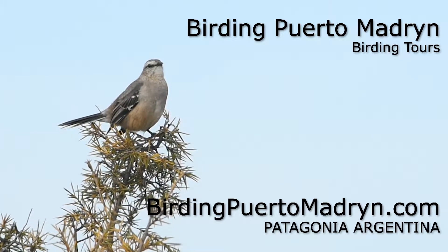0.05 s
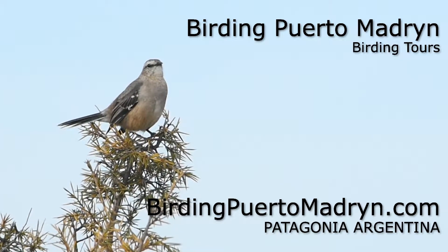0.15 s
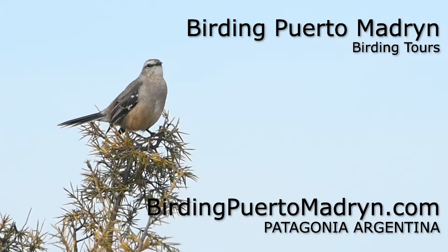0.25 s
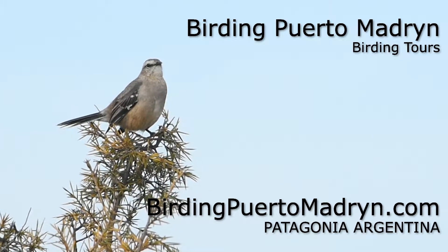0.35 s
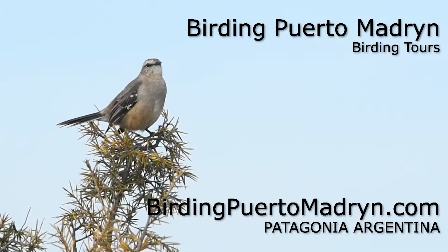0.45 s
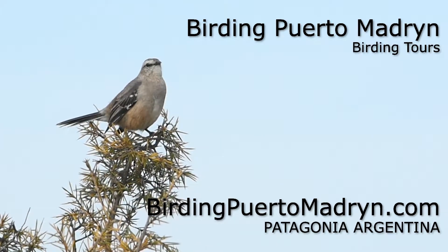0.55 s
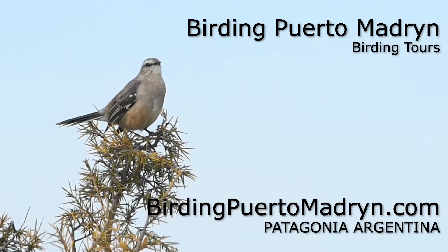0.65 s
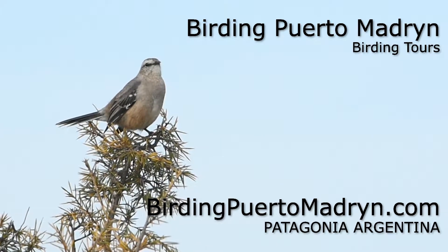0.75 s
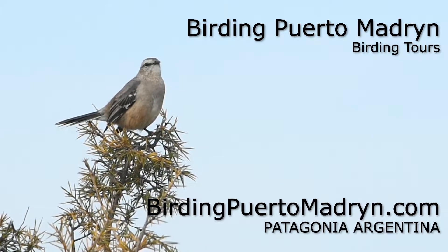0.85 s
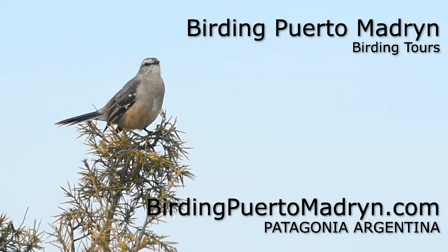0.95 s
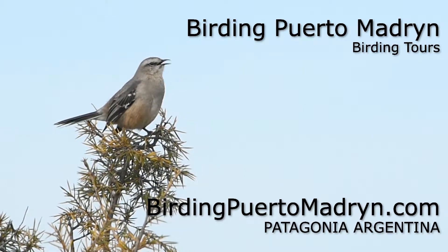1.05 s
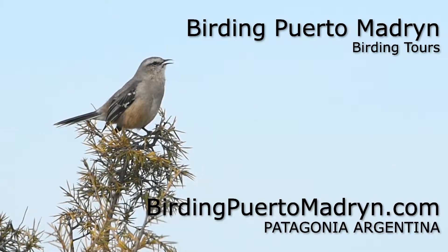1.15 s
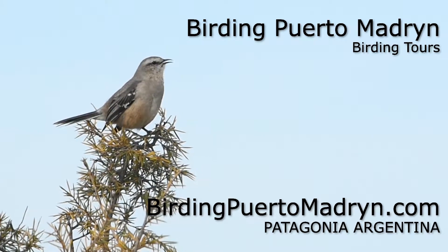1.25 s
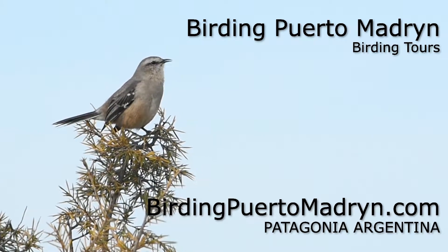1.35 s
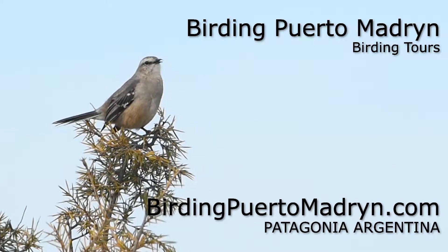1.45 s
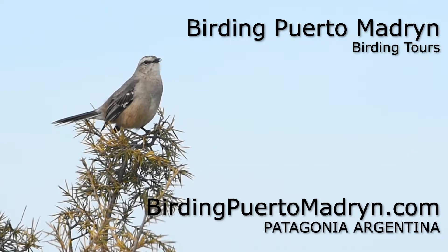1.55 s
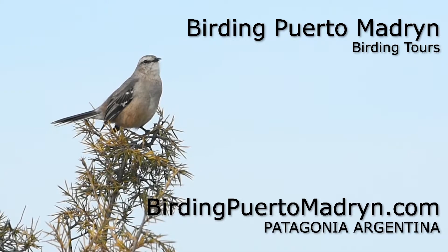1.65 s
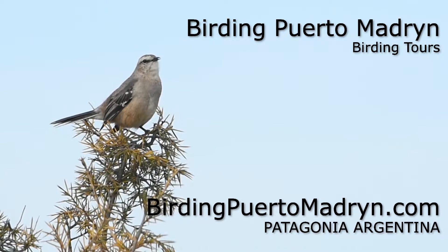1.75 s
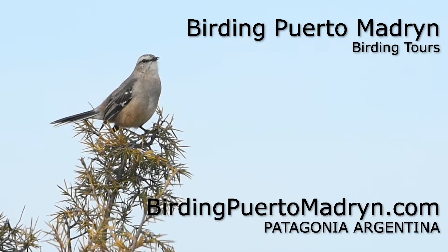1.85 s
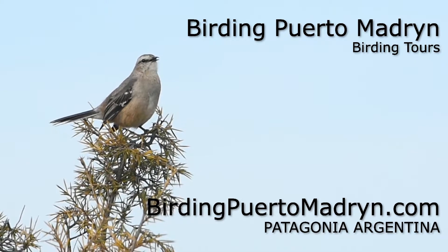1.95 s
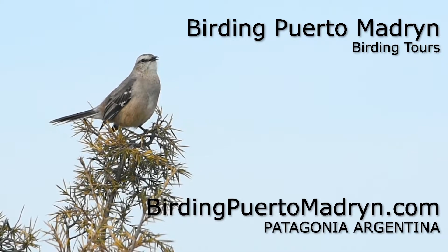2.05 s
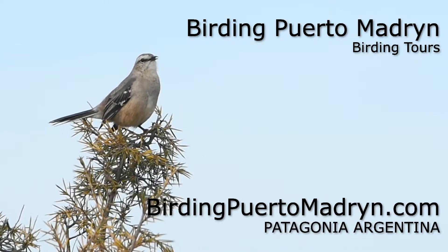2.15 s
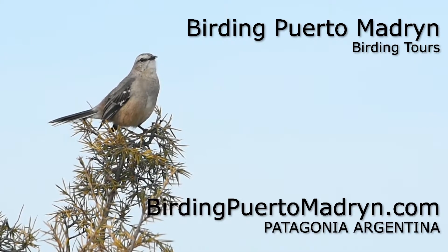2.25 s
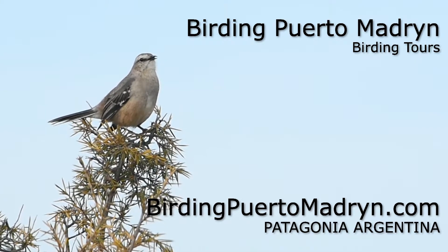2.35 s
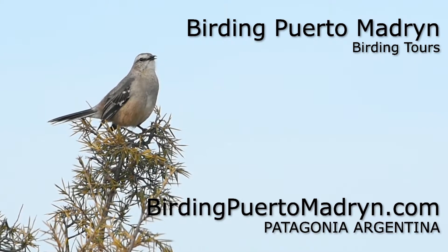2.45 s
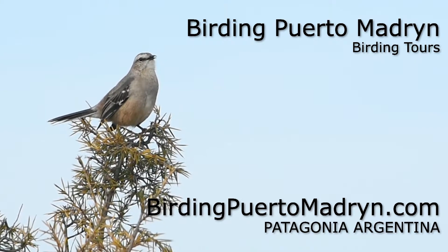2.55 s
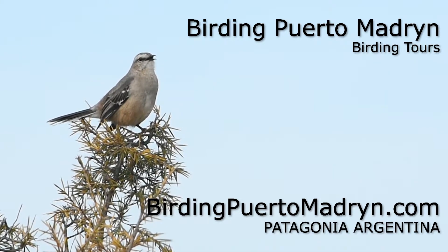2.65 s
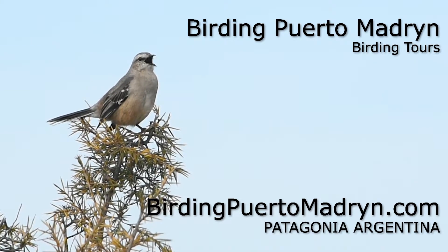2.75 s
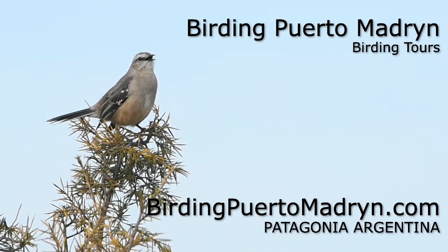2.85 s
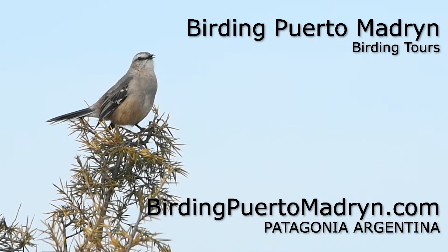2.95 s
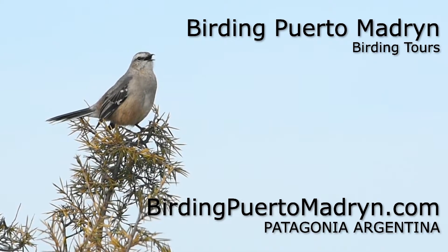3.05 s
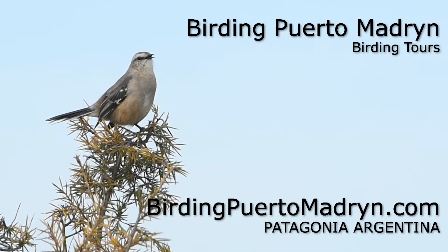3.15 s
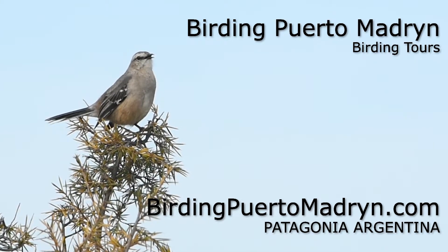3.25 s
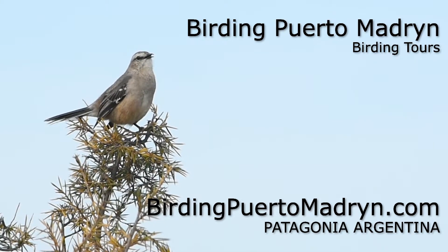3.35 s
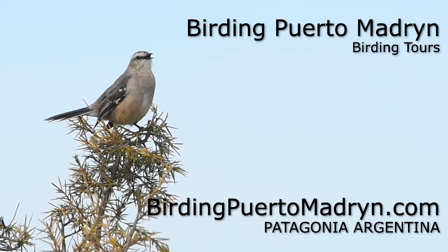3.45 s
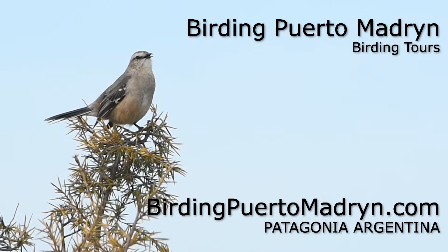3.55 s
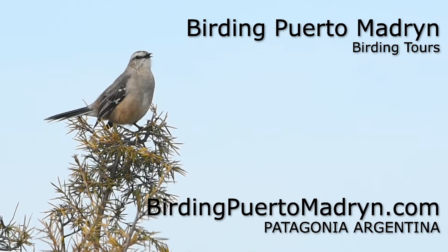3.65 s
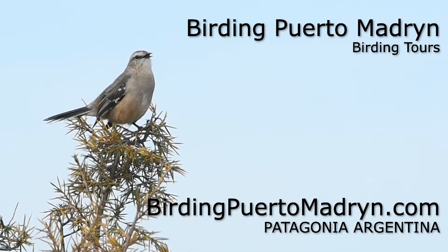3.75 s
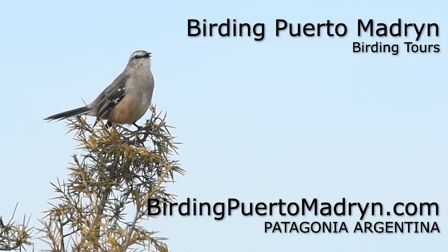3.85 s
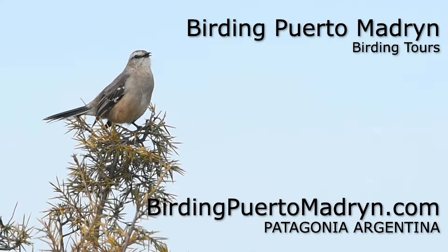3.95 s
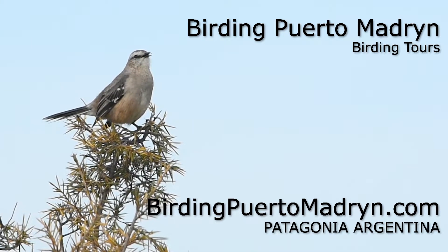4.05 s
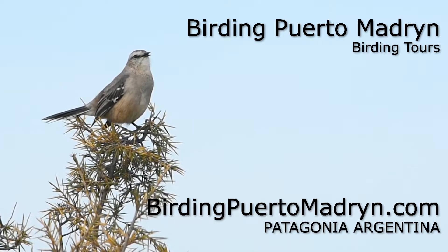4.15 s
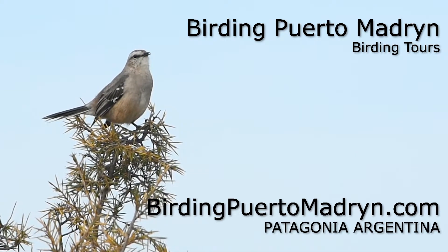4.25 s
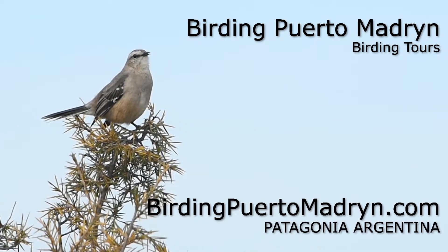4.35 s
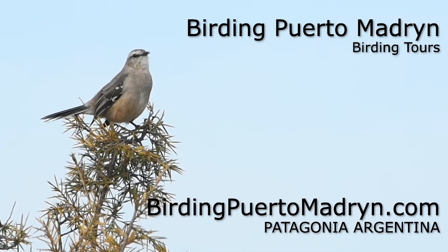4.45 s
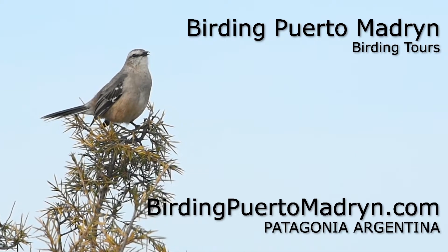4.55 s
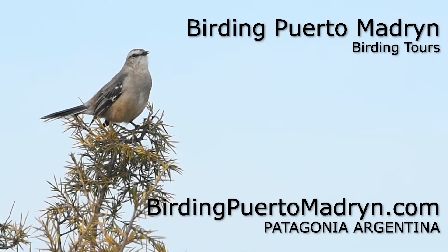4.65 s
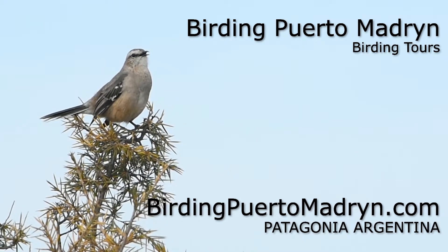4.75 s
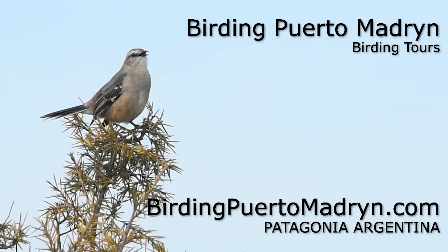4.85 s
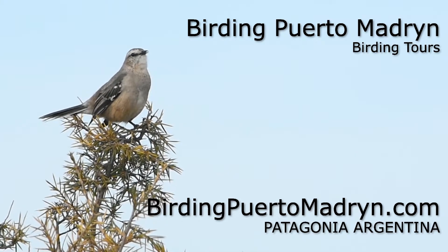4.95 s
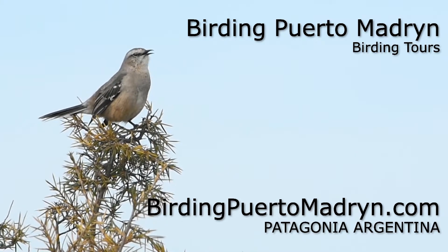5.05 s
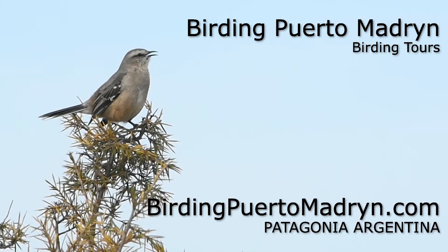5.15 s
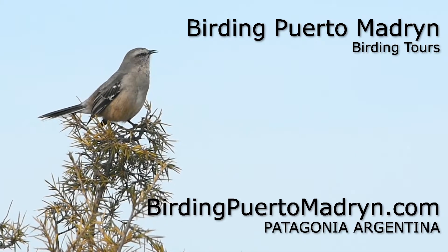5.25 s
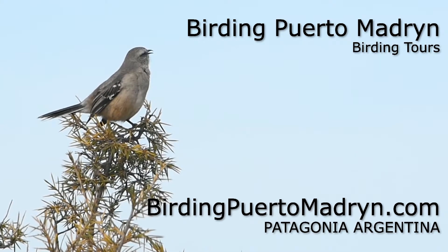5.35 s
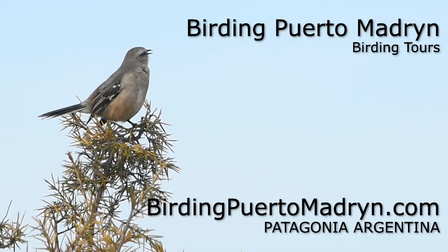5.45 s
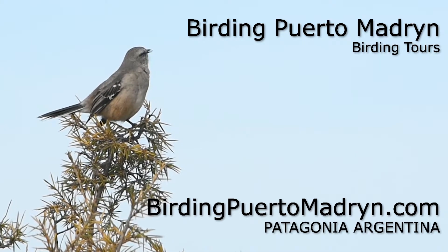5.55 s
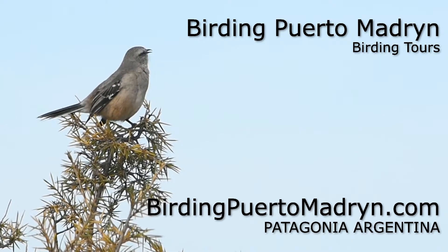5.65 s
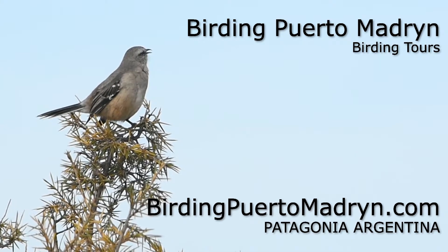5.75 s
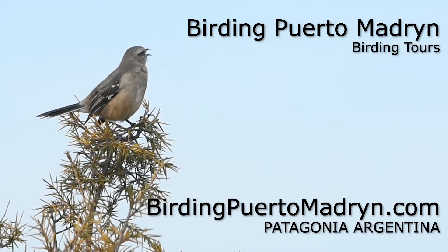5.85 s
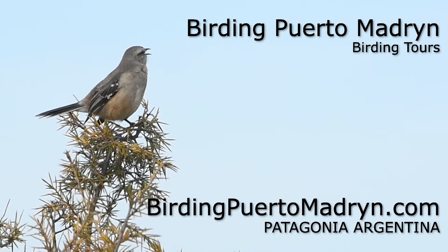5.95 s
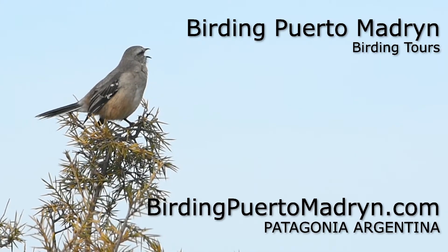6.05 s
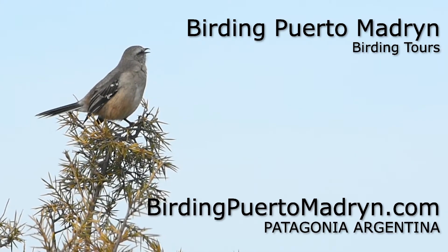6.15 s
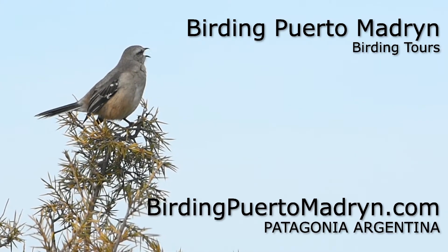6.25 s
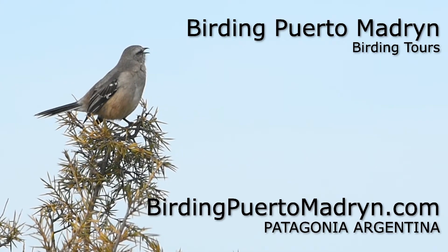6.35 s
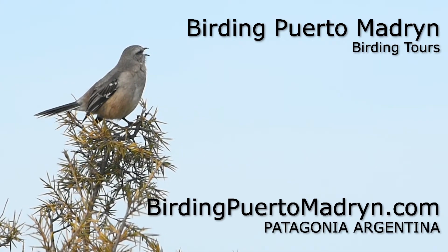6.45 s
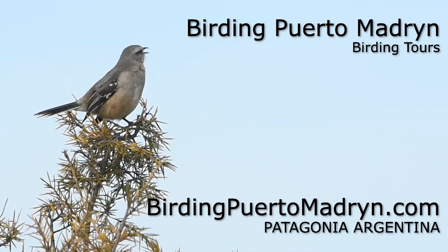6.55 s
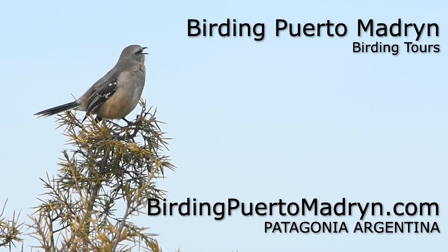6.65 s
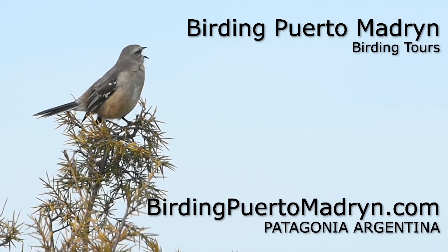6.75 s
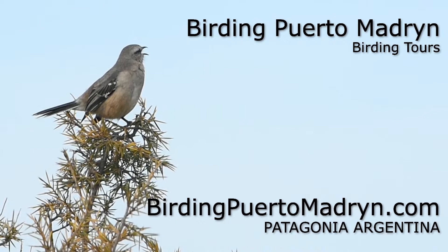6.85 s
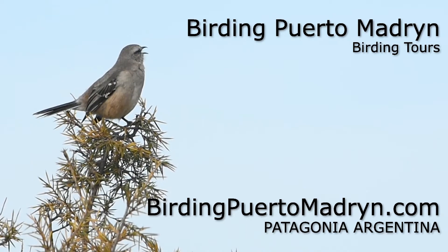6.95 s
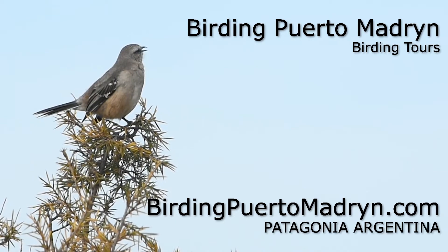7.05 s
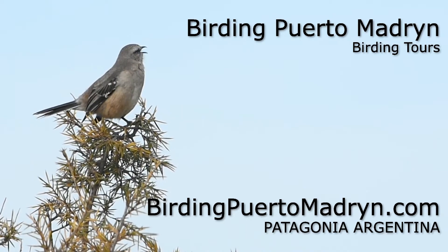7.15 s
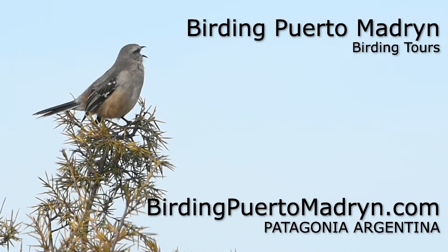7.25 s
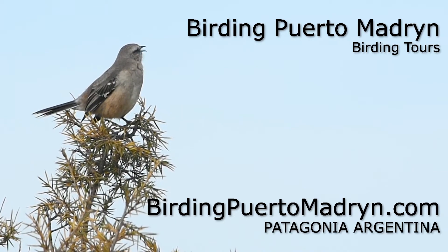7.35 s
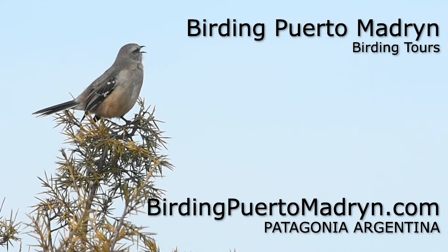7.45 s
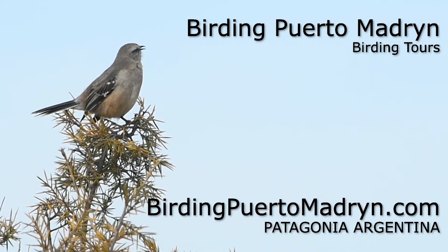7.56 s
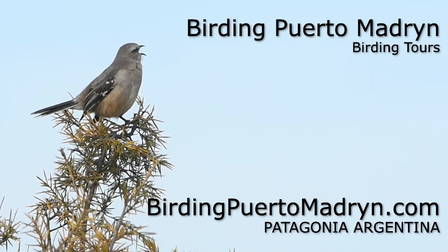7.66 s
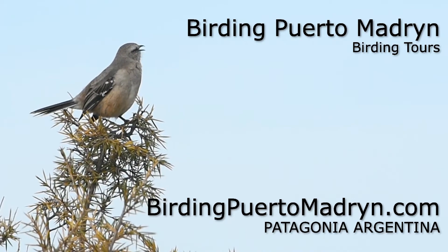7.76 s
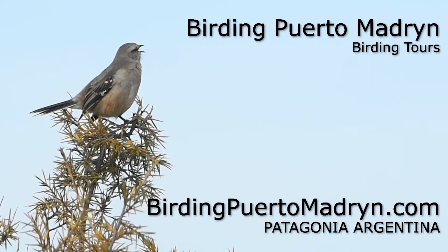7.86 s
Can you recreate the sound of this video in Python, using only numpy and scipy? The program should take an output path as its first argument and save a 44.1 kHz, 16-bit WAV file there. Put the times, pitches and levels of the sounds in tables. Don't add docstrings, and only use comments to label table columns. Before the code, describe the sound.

A mockingbird sings whistles, quick chips, warbling chups, raspy trills and deep swoops outdoors while low wind thumps and overloads the microphone.

```python
import sys
import numpy as np
from scipy import signal
from scipy.fft import rfft, irfft
from scipy.io import wavfile
from scipy.ndimage import uniform_filter1d

SR = 44100
rng = np.random.default_rng(int(sys.argv[2]) if len(sys.argv) > 2 else 0)


def file_out(sig):
    cols = np.atleast_2d(sig).T
    lim = np.clip(cols, -1, 1)
    pcm = np.round(lim * 32767).astype(np.int16)
    wavfile.write(sys.argv[1], SR, pcm)


def volts(x):
    e = np.asarray(x, float) / 20
    return 10 ** e


N = 348390

# start_s, peak_db, pitch_factor, second_voice_db, second_voice_pitch_factor
CHIPS = [(1.520, -27, 0.93, 0, 0.99), (1.645, -26.5, 0.91, 1, 1), (1.77, -27, 0.97, 5.5, 0.96),
         (1.9, -27, 0.95, 4.5, 0.98), (2.013, -25, 0.98, 1, 1.06), (2.15, -24, 0.94, -4, .96),
         (2.279, -24, 1.005, 4, .99), (2.41, -23.5, 0.93, -2, 1), (2.54, -25.5, 0.94, 5, 0.97),
         (2.661, -25.5, 0.93, 3, 1.06)]


def rms_one(x):
    return x / np.sqrt(np.mean(x ** 2, axis=-1, keepdims=True) + 1e-20)


def band(x, low_hz, high_hz, order=2):
    return signal.sosfilt(signal.butter(order, [low_hz, high_hz], "band", fs=SR, output="sos"), x)


def add(song, s, sound):
    at = int(round(s * SR))
    song[at:at + len(sound)] += sound[:N - at]


def wobble(count, hz):
    knots = rng.standard_normal(600)
    return np.interp(np.arange(count) * hz / SR, np.arange(600), knots)


def gusts():
    # full_strength_s, held_s, rumble_db, left_minus_right_db
    gust_rows = [(.1, 0.065, -28.5, 11.5), (.21, 0.013, -19.5, 9), (.46, 0.11, -29, 8.5),
                 (.62, 0.011, -17, 3.5), (.76, 0.0053, -26.5, -3), (.88, 0.021, -50, 7),
                 (1.049, 0.046, -28.5, 4.5), (1.5, 0.13, -35, 6), (1.94, 0.016, -52, 7),
                 (2.57, 0.009, -30.5, -2), (3.04, 0.086, -29.5, 5), (3.26, 0.095, -43, -2),
                 (3.57, 0.01, -32, -4.5), (3.679, 0.092, -40.5, -4), (4.0, 0.11, -36.5, -4.5),
                 (4.622, 0.17, -15.5, 0), (4.97, 0.13, -22.5, 0), (5.12, 0.07, -27.5, -6),
                 (5.48, 0.078, -20.5, 5.5), (5.582, 0.036, -10, -7.5), (5.83, 0.014, -28, -4),
                 (5.929, 0.005, -23.5, -11), (6.25, 0.16, -14.5, 8), (6.48, 0.17, -11.5, 4.5),
                 (6.85, 0.023, -20.5, -17), (7.19, 0.052, -34, -27), (7.406, 0.064, -15.5, -4.5),
                 (7.55, 0.084, -20.5, -0.5), (7.72, 0.017, -29.5, -6)]
    # time_s, rumble_db, left_minus_right_db
    breeze_rows = [(0, -36, 10), (1.0, -39, 3), (1.17, -64, 7), (1.7, -54, 4), (2.26, -65, 3),
                   (2.6, -45, 4.5), (3.099, -43.5, -3), (4.05, -46, -10), (4.4, -58, 6), (4.901, -25.5, 9),
                   (5.35, -34.5, 6), (5.75, -42, -7), (6.1, -25.5, -6), (6.75, -25.5, -7), (7.05, -40, -9),
                   (7.4, -25, 2), (7.9, -39.5, -5)]
    rise_db_per_s, fall_db_per_s = 308, 253
    veer_db, veer_per_s = 2.5, 15

    t = np.arange(0, N + 100, 100) / SR
    s, breeze_db, breeze_pan_db = np.transpose(breeze_rows)
    at, held, peak_db, pan_db = np.transpose(gust_rows)[:, :, None]
    before, after = np.maximum(at - t, 0), np.maximum(t - at - held, 0)
    power = volts(peak_db - rise_db_per_s * before - fall_db_per_s * after) ** 2
    breeze = volts(np.interp(t, s, breeze_db)) ** 2
    total = breeze + power.sum(axis=0)
    side_db = (breeze * np.interp(t, s, breeze_pan_db) + (power * pan_db).sum(axis=0)) / total

    every = np.arange(N) / SR
    rumble_db = np.interp(every, t, 10 * np.log10(total))
    side_db = np.interp(every, t, side_db)
    return rumble_db, side_db + veer_db * wobble(N, veer_per_s)


def eddies(low_hz, high_hz, even_s, alike):
    white = rng.standard_normal((2, N + SR))
    white[1] += alike * white[0]
    noise = band(white, low_hz, high_hz)[:, SR:]
    return rms_one(noise / np.sqrt(uniform_filter1d(noise ** 2, int(even_s * SR), axis=1) + 1e-9))


def buffets():
    # middle_s, peak_db, width_s, port (0 left, 1 right)
    bursts = [(0.217, -5.5, 0.012, 0), (4.619, 5.5, 0.015, 1), (4.698, 4, 0.011, 1), (4.718, 3.5, 0.012, 0),
              (4.727, -0.5, 0.0061, 1), (4.754, 2, 0.015, 0), (4.772, 3.5, 0.017, 1), (4.976, -4, 0.034, 1),
              (5.501, -6.5, 0.01, 0), (5.635, -2.5, 0.011, 0), (5.592, -2.5, 0.0038, 1),
              (5.619, 9, 0.0054, 1), (6.235, 1, 0.0027, 1), (6.264, 0, 0.02, 1), (6.267, 0.5, 0.027, 0),
              (6.324, -3.5, 0.0073, 0), (6.354, 3.5, 0.0074, 1), (6.368, -2, 0.021, 0),
              (6.385, -4.5, 0.025, 1), (6.415, 1.5, 0.0095, 0), (6.484, 8, 0.019, 0),
              (6.519, 2.5, 0.011, 0), (6.552, 14, 0.0092, 0), (6.571, -7, 0.0073, 1), (6.593, -4, 0.037, 0),
              (6.642, 0.5, 0.0097, 0), (6.675, -3.5, 0.0051, 1), (6.845, -1.5, 0.0062, 1),
              (7.439, -5, 0.0043, 1), (7.634, -2.5, 0.012, 1), (6.247, -9, 0.0058, 1), (6.535, -4, .005, 0),
              (7.706, -10, 0.0073, 1), (5.603, -13, 0.0064, 0), (7.609, -7.5, 0.0042, 1),
              (5.698, -17, 0.0064, 1), (0.469, -15, 0.0055, 0), (0.632, -9.5, 0.0092, 0),
              (6.695, -14.5, 0.0035, 1), (.118, -8.5, 0.013, 0), (0.758, -12, 0.015, 0),
              (.85, -14.5, 0.015, 0), (1.035, -12.5, 0.015, 0), (3.057, -21.5, 0.013, 0),
              (4.066, -18, 0.011, 1), (0.941, -23, 0.0075, 0), (5.497, -14, 0.0046, 1),
              (6.66, -10, 0.0032, 0)]
    swings, calm = np.zeros((2, N)), np.ones((2, N))
    twists = rng.uniform(0, 2 * np.pi, (len(bursts), 2))
    t = np.arange(-.08, .08, 1 / SR)
    for (s, peak_db, width, port), (twist, edge) in zip(bursts, twists):
        side = int(port > .5)
        window = np.exp(-2.77 * (t / width) ** 2)
        eddy_hz = 89.5 * (0.0092 / width) ** 0.37
        phase = 2 * np.pi * eddy_hz * t + twist
        swing = np.sin(phase + 0.39 * np.sin(phase + edge))
        add(swings[side], s + t[0], volts(peak_db) * window * swing)
        add(calm[side], s + t[0], -.8 * np.sqrt(window))
    return swings, np.maximum(calm, .1)


def wind():
    rumble_db, pan_db = gusts()
    rumble = eddies(58.5, 85.4, even_s=0.0446, alike=-0.43)

    deep = band(eddies(21.0, 49.9, even_s=0.045, alike=0.13), 26.5, 53.5)
    deep *= volts(-4.0 - 0.4 * (rumble_db + 15.0) + 2.0 * wobble(N, 3.65))

    flutter = band(eddies(154, 224, even_s=0.23, alike=0.013), 70, 290)
    flutter *= volts(-23 + 0.9 * (rumble_db + 14.0))
    middle = band(eddies(105, 140.0, even_s=0.37, alike=0), 105.6, 204)
    flutter += volts(-9.5 + 0.47 * (rumble_db + 17.5) + 3.8 * wobble(N, 25)) * middle

    swings, calm = buffets()
    level = volts(rumble_db + 0.5 + pan_db / 2 * [[1], [-1]])
    return level * (calm * (rumble + flutter) + deep) + swings


def hiss():
    # frequency_hz, density_db
    colour_points = [(120, -12.5), (200, -13), (316, -16), (527, -18), (1550, -20), (2830, -21.5),
                     (5680, -24), (15800, -32.5)]
    hiss_db, whine_hz, whine_db = -47.5, 15734, -72
    hz = np.maximum(np.arange(N // 2 + 1) * SR / N, 20)
    point_hz, point_db = np.transpose(colour_points)
    colour = volts(np.interp(np.log(hz), np.log(point_hz), point_db))
    noise = irfft(rfft(rng.standard_normal((2, N))) * colour, N)
    whine = volts(whine_db) * np.sin(2 * np.pi * whine_hz * np.arange(N) / SR)
    return volts(hiss_db + 3.5) * rms_one(noise) + whine


def whistle(song, rows, overtones_db, start=0., factor=1., gain_db=0., flutter_db=-0.5, breath_db=-50.0,
            tilt_db=-5, closing_db=0, shadow_db=-90):
    s, hz, level_db = np.transpose(sorted(rows))
    t = np.arange(s[0], s[-1], 1 / SR)
    u = (t - s[0]) / (s[-1] - s[0])
    pitch = factor * uniform_filter1d(np.interp(t, s, hz), size=110, mode="nearest")
    phase = 2 * np.pi * np.cumsum(pitch) / SR
    tone = np.sin(phase) * (1 + volts(breath_db) * wobble(len(t), 3000))

    closing = closing_db * np.clip(4 * u - 3, 0, 1)
    for k, over_db in enumerate(overtones_db, 2):
        beak_db = 10 * np.exp(-((k * pitch - 4800) / 450) ** 2)
        beak_db += tilt_db * np.log2(k * pitch / 5000) + closing
        audible = k * pitch < .4 * SR
        tone += volts(over_db + beak_db + 1.5 * wobble(len(t), 404)) * audible * np.sin(k * phase)

    trailing = 1.078 * np.interp(t - 0.0071, t, pitch)
    tone += volts(shadow_db) * np.sin(np.pi * u) * np.sin(2 * np.pi * np.cumsum(trailing) / SR)

    level = volts(np.interp(t, s, level_db) + gain_db + flutter_db * wobble(len(t), 308))
    add(song, start + s[0], np.sqrt(2) * level * signal.windows.tukey(len(t), .1) * tone)


def clear_whistles(song):
    # time_s, pitch_hz, rms_db
    tracks = [
        [(0.176, 2700, -54), (0.188, 2200, -48), (0.2159, 2320, -41.5), (0.2355, 2290, -59)],
        [(1.209, 4440, -39.5), (1.2225, 3480, -33), (1.2344, 3310, -27), (1.266, 3430, -38.5),
         (1.279, 3300, -44), (1.2888, 2940, -36), (1.3058, 2740, -20.5), (1.341, 2520, -26.5),
         (1.357, 2320, -70)],
        [(2.905, 4640, -48), (2.915, 5200, -40), (2.9274, 5620, -26), (2.935, 6170, -48), (2.947, 6700, -52)],
    ]
    for rows, overtones_db in zip(tracks, ([-30], [-50, -36], [-17])):
        whistle(song, rows, overtones_db, flutter_db=-1.5)


def rough_notes(song, rows, glide, droop, crest_s, depth, speed_up, throb_db, beat_hz, sides_db, rough,
                swell, duet, rush_db, rush_s, answer_db=0, skew=0, lead=0, leans_db=(0,) * 9, under_db=0):
    for (s, length, level_db, first_hz, rate), lean_db in zip(rows, leans_db):
        t = np.arange(0, length, 1 / SR)
        u = t / length
        second = volts(np.interp(u, *np.transpose(duet)))
        turn = 2 * np.pi * rate * (t - crest_s) * (1 + speed_up * u ** 2)
        turn = turn + skew * (np.cos(turn) - 1)
        throb = np.cos(turn + lead)

        warble = depth * (1 - 0.41 * u) * np.cos(turn) + rough * wobble(len(t), 902.0)
        pitch = first_hz * (1 + (glide - 1) * u - droop * u ** 4) * (1 + second * warble)
        beat = beat_hz * pitch / first_hz * (1 + 2.62 * rough * wobble(len(t), 204.6))
        phase, beat_phase = 2 * np.pi * np.cumsum([pitch, beat], axis=1) / SR

        note = volts(-throb_db * (0.32 - 0.25 * u) * throb) * np.sin(phase)
        note += volts(-34.0 - 26 * u) * np.sin(2 * phase + beat_phase)
        note += volts(-40.0) * np.sin(3 * phase + beat_phase) + volts(-42.0) * np.sin(4 * phase)
        for k, side_db in zip((-1, -0.5, 1, 2.5, 4.0), sides_db):
            line_db = side_db + lean_db * (k > 0) + answer_db * throb + 3 * wobble(len(t), 187.0)
            note += second * volts(line_db) * np.sin(phase + k * beat_phase)

        swell_db = np.interp(u, *np.transpose(swell)) - 2.0 * (1.5 - 0.26 * u) * throb
        level = volts(level_db + under_db + swell_db + 2 * wobble(len(t), 413.4))
        air = rng.standard_normal(len(t))
        air = rms_one(band(air, 2120, 4030)) + volts(-8.0) * rms_one(band(air, 2400, 8800))
        rush = volts(level_db + rush_db) * t / rush_s * np.exp(1 - t / rush_s) * air
        add(song, s, signal.windows.tukey(len(t), .06) * (level * rms_one(note) + rush))


def far_call(song):
    call = [(1.05, 0.0433, -50, 2920, 60)]      # start_s, length_s, rms_db, first_pitch_hz, warbles_per_s
    rough_notes(song, call, glide=0.76, droop=0, crest_s=0.011, depth=0.047, speed_up=.01, throb_db=2,
                beat_hz=510, sides_db=(-30, -3, -3, -30, -30), rough=0.086,
                swell=[(0, -6), (.6, -1), (1, -7)], duet=[(0, 0), (1, 0)], rush_db=-30, rush_s=.02)


def chips(song):
    # after_start_s, length_s, first_hz, last_hz, peak_db
    strokes = [
        (0.0005, 0.0098, 1885, 3500, -9.5),
        (0.011, .0125, 3400, 1570, -5),
        (0.0245, .009, 1800, 2150, -10),
    ]
    inner_stroke = (.009, .011, 2280, 1850, -8.5)
    edge_db, late = -16, 0.863
    for s, peak_db, factor, inner_db, inner in CHIPS:
        parts = zip([*strokes, inner_stroke], [0, 0, 0, inner_db], [1, 1, 1, inner])
        for (at, length, first_hz, last_hz, db), gain_db, shift in parts:
            peak = late if last_hz < first_hz else 1 - late
            rows = [(0, first_hz, db + 0.57 * edge_db),
                    (peak * length, first_hz + peak * (last_hz - first_hz), db),
                    (length, last_hz, db + edge_db)]
            whistle(song, rows, [-31], tilt_db=-14, start=s + at, factor=factor * shift,
                    gain_db=peak_db + gain_db, flutter_db=4.5, breath_db=-20)


def quaver(song):
    # time_s, mean_pitch_hz, rms_db
    track = [(2.821, 7050, -50), (2.827, 6995, -48), (2.838, 6830, -39), (2.857, 5640, -34),
             (2.873, 4900, -30.5), (2.882, 4900, -40), (2.888, 4900, -50)]
    vibrato_per_s, depth, crest_s, fade_in_s = 98, .035, 2.8568, .03
    s, hz, level_db = np.transpose(track)
    t = np.arange(s[0], s[-1], 20 / SR)
    grown = np.clip((t - s[0]) / fade_in_s, 0, 1) ** 2
    swing = depth * grown * np.cos(2 * np.pi * vibrato_per_s * (t - crest_s))
    rows = list(zip(t, np.interp(t, s, hz) * (1 + swing), np.interp(t, s, level_db)))
    whistle(song, rows, [-16], flutter_db=4.0)


def chups(song):
    # start_s, length_s, rms_db, first_pitch_hz, warbles_per_s
    notes = [(3.05, 0.074, -27, 2950, 57), (3.224, 0.077, -26.5, 3026, 58), (3.459, 0.073, -28, 2910, 67),
             (3.64, 0.077, -27.5, 2980, 51), (3.891, .070, -26.5, 3030, 66),
             (4.062, 0.071, -26, 2956, 52.6)]
    rough_notes(song, notes, glide=0.8, droop=.19, crest_s=0.015, depth=0.154, speed_up=0.015, throb_db=7,
                beat_hz=721.0, sides_db=(-13.5, -9.0, -8.5, -23, -27.0), rough=.022,
                swell=[(0, -35), (.15, 3.5), (.35, 0), (.8, 0.5), (1, -13)],
                duet=[(0, 1), (.82, -1.5), (1, -9.5)], rush_db=-8.5, rush_s=0.011,
                skew=.35, lead=.5, leans_db=(-1,) * 6)


def slurs(song):
    # start_s, length_s, rms_db, first_pitch_hz, warbles_per_s
    notes = [
        (4.314, .092, -26.5, 2594, 76.6),
        (4.547, 0.098, -25, 2690, 82),
    ]
    rough_notes(song, notes, glide=.7, droop=0, crest_s=0.0141, depth=0.091, speed_up=0.032, throb_db=-6.0,
                beat_hz=695.0, sides_db=(-18.0, -2.0, -3.0, -22.0, -28.0), rough=.025,
                swell=[(0, -9), (.15, -2), (.4, 3), (.7, -5), (1, -19)],
                duet=[(0, -0.21), (1, -1)], rush_db=-19, rush_s=0.02, under_db=-9)


def pips(song):
    # start_s, peak_db, pitch_hz, length_s
    pickup_rows = [
        (4.304, -34.5, 1594, 0.015),
        (4.544, -32, 1660, 0.012),
        (4.815, -32.5, 1605, 0.018),
        (5.121, -31.5, 1605, 0.017),
        (5.431, -32, 1630, 0.017),
        (5.724, -36, 1610, 0.021),
    ]
    pip_rows = [(4.763, -26, 1674, 0.016), (4.779, -23, 1804, 0.0083), (4.786, -49, 1720, 0.0086),
                (5.056, -30, 1740, 0.0065), (5.066, -24.5, 1736, 0.011), (5.078, -24, 1830, 0.011),
                (5.09, -24.5, 1850, 0.0072), (5.371, -26.5, 1740, 0.013), (5.385, -26.5, 1850, 0.0094),
                (5.399, -27.5, 1730, 0.007), (5.666, -27.5, 1755, 0.01), (5.677, -31.5, 1780, 0.015),
                (5.69, -26, 1790, 0.0087)]
    notes = [(*row, .055, -31) for row in pip_rows]
    notes += [(*row, .015, -13.5) for row in pickup_rows]
    for s, peak_db, hz, length, fall, octave_db in notes:
        shape = [(0, (1 + fall) * hz, -14),
                 (0.16 * length, (1 + 0.89 * fall) * hz, -1.5),
                 (0.28 * length, hz, 0),
                 (0.69 * length, (1 - 0.7 * fall) * hz, -3),
                 (length, (1 - fall) * hz, -16)]
        whistle(song, shape, [octave_db], start=s, gain_db=peak_db - 1.0, flutter_db=0.0)


def rasps(song):
    # start_s, length_s, rms_db, first_pitch_hz, warbles_per_s
    notes = [
        (4.837, 0.099, -28.5, 2023, 85.3),
        (5.139, 0.098, -28.5, 1962, 93),
        (5.449, 0.11, -29, 1993, 89.5),
        (5.745, 0.098, -30, 1928, 91),
    ]
    leans_db = [3, 0, 4, 0]
    rough_notes(song, notes, glide=1.12, droop=0, crest_s=0.0092, depth=0.037, speed_up=0.28, throb_db=7,
                beat_hz=397.0, sides_db=(-2.5, -14, -2.5, -15.0, -23.0), rough=.048,
                swell=[(0, 4), (.2, -0.5), (.6, 2), (.9, -4.5), (1, -9)],
                duet=[(0, -1.5), (.15, -1.5), (.3, 1.5), (.6, 2.5)], rush_db=-19.5, rush_s=0.03,
                answer_db=5, leans_db=leans_db, under_db=-4)


def swoops(song):
    # turn_s, fall_s, top_hz, bottom_hz, last_hz
    turns = [(6.063, 0.033, 6150, 2376, 4700), (6.215, 0.028, 5400, 2368, 4200),
             (6.45, 0.023, 5880, 2560, 4880), (6.586, 0.027, 5730, 2634, 5500),
             (6.785, 0.028, 6130, 2594, 4660), (6.935, 0.024, 5850, 2497, 4900),
             (7.063, 0.028, 5700, 2337, 4650), (7.283, .029, 5670, 2414, 5040),
             (7.427, 0.031, 5690, 2470, 4120), (7.589, 0.032, 5410, 2414, 4470),
             (7.837, 0.030, 5580, 2590, 4280)]
    # fall_bow (under 1 lingers high), gain_db, creep_in (share of fall time)
    manners = [(1.05, -1.5, 0.27), (1.4, 0, .1), (1.5, -0.5, 0.15), (1.5, -0.5, 0.13), (0.74, 0, 0.55),
               (.8, -0.5, 0.23), (2, 0, 0.32), (0.84, 0.5, 0.42), (0.69, 1, 0.13), (1.3, 0.5, 0.45),
               (1.8, 1.5, .15)]
    # share_of_fall_time, share_of_drop_to_go, rms_db
    fall_shape = [(0.119, .94, -33.5), (0.459, .7, -28), (.88, .08, -29.5), (1, 0.019, -33.5)]
    # after_dwell_s, share_of_climb, rms_db
    rise_shape = [(0, .03, -34), (.002, .14, -28), (.0075, .88, -29), (0.01, 1.0, -26)]
    creep_db, dwell_db = -54.5, -32.5
    dwell_s_per_khz, no_dwell_hz = 0.023, 2690
    for (turn, fall_s, top_hz, bottom_hz, last_hz), (bow, gain_db, creep) in zip(turns, manners):
        half = dwell_s_per_khz * max(no_dwell_hz - bottom_hz, 30) / 2000
        fall = [(-creep, 1.03, creep_db), (0, 1, creep_db + 7)]
        fall += [(u ** bow, share, db) for u, share, db in fall_shape]
        rows = [((u - 1) * (fall_s - half) - half, bottom_hz + share * (top_hz - bottom_hz), db)
                for u, share, db in fall]
        rows += [(0, bottom_hz, dwell_db)]
        rows += [(half + s, bottom_hz + share * (last_hz - bottom_hz), db) for s, share, db in rise_shape]
        whistle(song, rows, [-14.5, -15, -19, -10], shadow_db=-16.0, start=turn, gain_db=gain_db,
                flutter_db=3.0, breath_db=-22.5, closing_db=-9, tilt_db=-11)


def mockingbird():
    song = np.zeros(N)
    for phrase in (clear_whistles, far_call, chips, quaver, chups, slurs, pips, rasps, swoops):
        phrase(song)
    return song


def stroke_trains(song, rows, stroke, middle_hz, glide, swell, leans_db, octave_db):
    lower_half = stroke[-4:] if glide < 0 else stroke[-3:]
    for (start, length, first_gap, last_gap, level_db), lean_db in zip(rows, leans_db):
        s = 0.
        for k in range(16):
            u = min(s / length, 1)
            points = lower_half if k == 0 else stroke
            shape = [(at, share, db + lean_db * (share > 1.2)) for at, share, db in points]
            gain_db = level_db + np.interp(u, *np.transpose(swell)) - 90 * (s > length)
            whistle(song, shape, [octave_db], start=start + s, factor=middle_hz * (1 + glide * u),
                    gain_db=gain_db, flutter_db=1.5, breath_db=-17)
            s += first_gap + (last_gap - first_gap) * u ** 2


def duets():
    # after_start_s, pitch_hz, rms_db
    chip_after = [(.016, 3600, -35), (.021, 3310, -23), (.028, 2800, -22), (.033, 2500, -30)]
    # from_first_stroke_s, pitch_hz, rms_db
    slur_lead = [(-.017, 3130, -44), (-.012, 2730, -29), (-.007, 2466, -35), (0, 2780, -32),
                 (.003, 2770, -47)]
    # first_stroke_s, length_s, first_gap_s, last_gap_s, rms_db
    slur_trains = [
        (4.327, .075, .0125, .0095, -25),
        (4.565, .066, .013, 0.0099, -24),
    ]
    rasp_trains = [
        (4.84, 0.094, 0.011, 0.0073, -27),
        (5.143, 0.087, 0.01, 0.0064, -26),
        (5.454, .084, .014, 0.01, -27),
        (5.749, .1, .0096, 0.0059, -26.5),
    ]
    # from_middle_s, pitch_factor, level_db
    slur_stroke = [(-.016, 1.37, -8), (-.012, 1.3, -3), (-.005, 1.11, -1.5), (0, 1.002, -2.5),
                   (.003, .92, -5.5), (.006, 0.74, -21)]
    rasp_stroke = [(-.016, 1.8, -24), (-.012, 1.6, -15), (-.009, 1.43, -11), (-.0065, 1.3, -4),
                   (-.0035, 1.1, -7.5), (0, 1.0, 1), (.003, 0.955, -5), (.007, .78, -15)]

    song = np.zeros(N)
    for s, peak_db, factor, *_ in CHIPS:
        whistle(song, chip_after, [-40], start=s, factor=factor, gain_db=peak_db, flutter_db=4.0, breath_db=-2)
    for row in slur_trains:
        whistle(song, slur_lead, [-40], start=row[0], flutter_db=3.0)
    stroke_trains(song, slur_trains, slur_stroke, middle_hz=2034, glide=-0.135,
                  swell=[(0, -4), (.2, 1), (.5, -0.5), (1, -14)], leans_db=[-1.5, 1.5], octave_db=-31.5)
    stroke_trains(song, rasp_trains, rasp_stroke, middle_hz=2040, glide=0.0696,
                  swell=[(0, -0.5), (.3, 1), (.8, -2), (1, -5.5)], leans_db=[-1.0, -4, 0.5, -6], octave_db=-42)
    return song


def scrubland(song):
    ground_lag_s, ground_share = 0.001501, 0.23
    scatter_t60_s, scatter_db, flutter_db = 0.91, -15.5, 4.5
    t = np.arange(N) / SR
    near = song + ground_share * np.interp(t - ground_lag_s, t, song)

    lag = np.arange(SR // 2) / SR
    decay = volts(-60 * lag / scatter_t60_s) * np.minimum(lag / 0.00087, 1)
    decay *= 1 + 4.5 * np.exp(-lag / 0.008)
    sway = 0.61 * wobble(N, 3.5)
    scatter = 0
    for share in (np.cos(sway), np.sin(sway)):
        tail = rng.standard_normal((2, len(lag))) * decay
        tail = tail[0] + 0.19 * tail[1] * [[1], [-1]]
        tail = band(tail, 2300, 7100, order=1)
        tail /= np.sqrt(np.sum(tail ** 2, axis=1, keepdims=True))
        scatter = scatter + share * signal.fftconvolve(near[None], tail, axes=1)[:, :N]
    direct = near * volts(np.array([[.15], [-.15]]))
    return direct + volts(scatter_db + flutter_db * wobble(N, 45)) * scatter


def scene():
    return wind() + hiss() + scrubland(mockingbird()) + scrubland(duets())


def low_pass(x):
    return signal.sosfilt(signal.butter(12, 15800, fs=SR, output="sos"), x)


def record(dry):
    clipped = np.clip(dry, -1, 1)
    mix = signal.sosfilt(signal.cheby2(14, 60, 16500, fs=SR, output="sos"), clipped)
    return low_pass(mix)


dry = scene()
out = record(dry)
file_out(out)
```